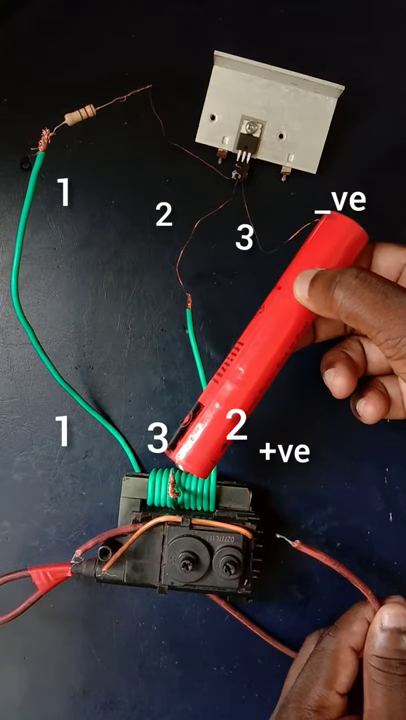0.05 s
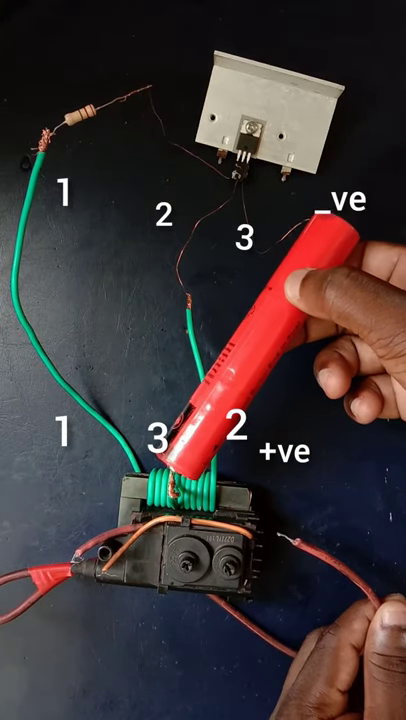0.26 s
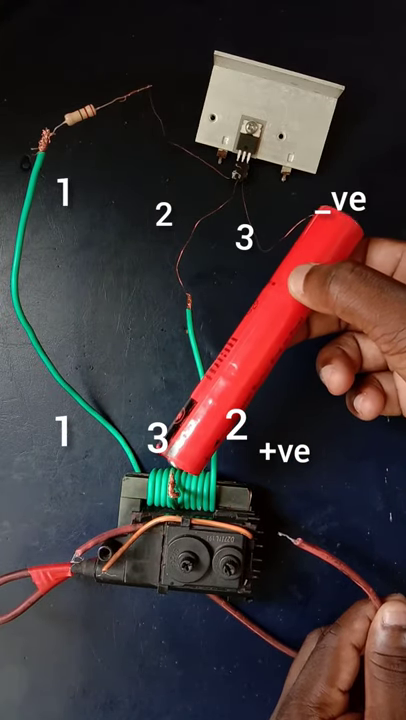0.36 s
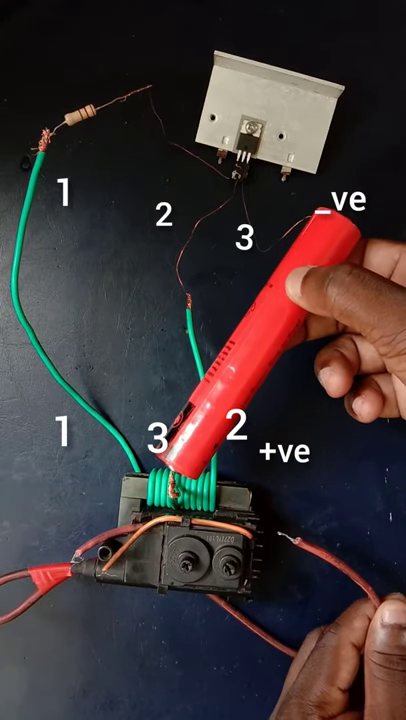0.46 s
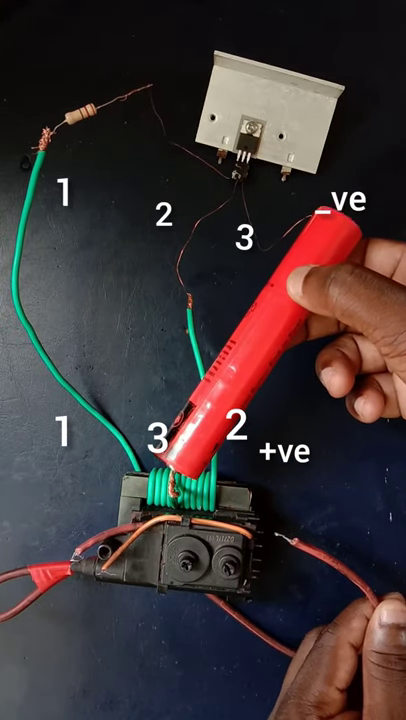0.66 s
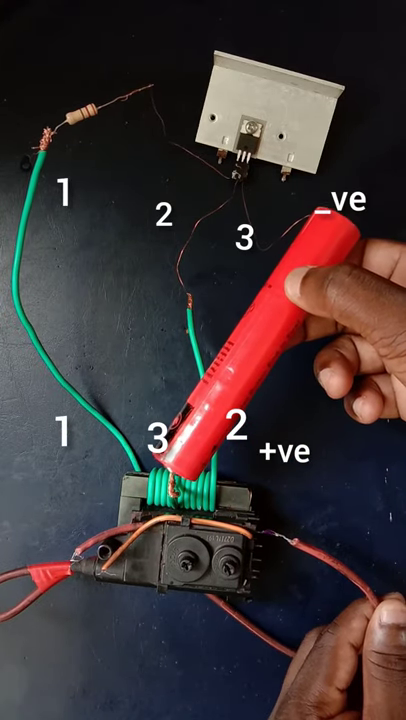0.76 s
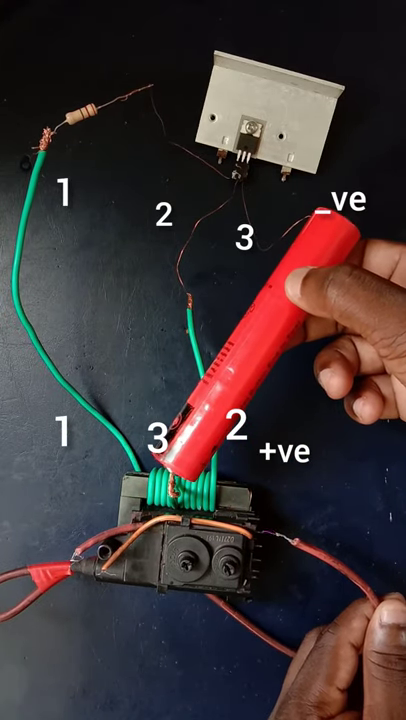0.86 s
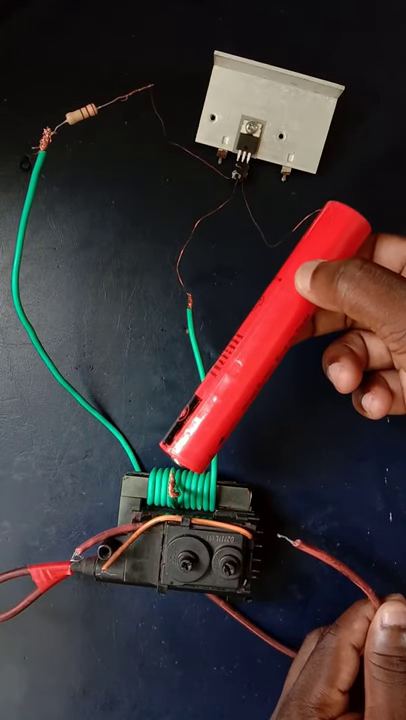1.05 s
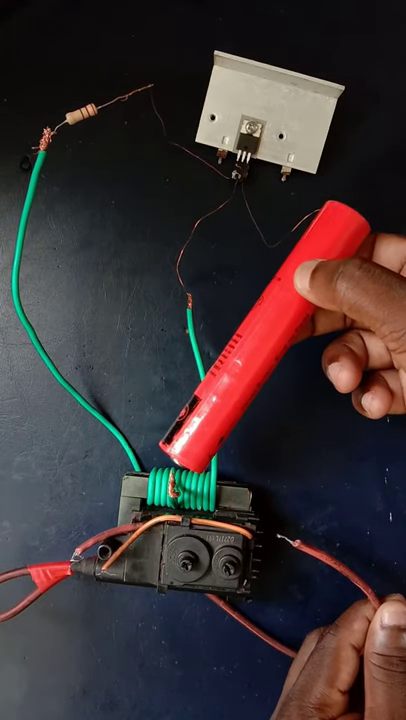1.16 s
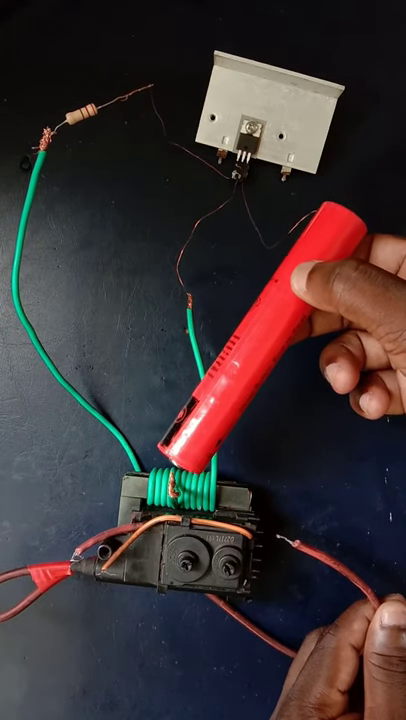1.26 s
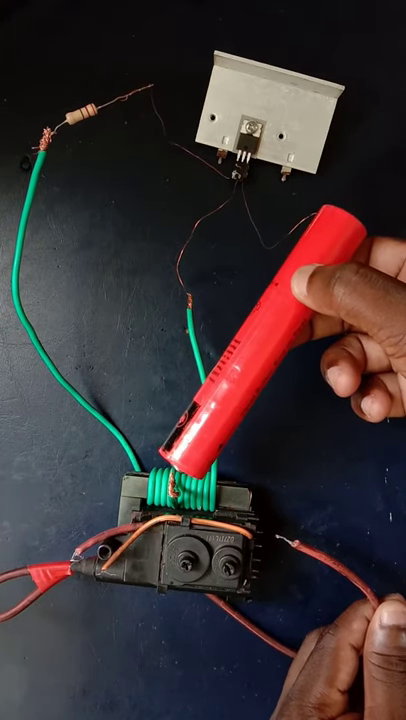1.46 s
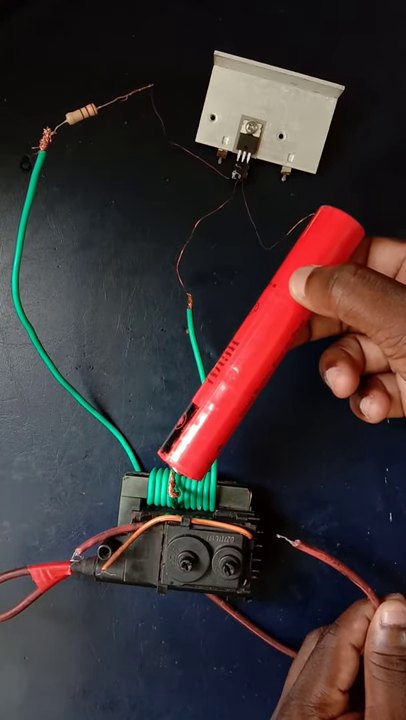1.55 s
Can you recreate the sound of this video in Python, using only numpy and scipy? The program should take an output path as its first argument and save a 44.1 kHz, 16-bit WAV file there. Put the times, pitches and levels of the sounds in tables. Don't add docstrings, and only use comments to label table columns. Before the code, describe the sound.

Electric arcing crackles in short, harsh, buzzing bursts across a small wire gap, close up.

```python
import sys
import numpy as np
from scipy import signal
from scipy.fft import rfft, irfft
from scipy.io import wavfile
from scipy.ndimage import uniform_filter1d

SR = 44100
rng = np.random.default_rng(int(sys.argv[2]) if len(sys.argv) > 2 else 0)


def to_wav(s):
    ch = np.atleast_2d(s).T
    pcm = np.round(np.clip(ch, -1, 1) * 32767)
    wavfile.write(sys.argv[1], SR, pcm.astype(np.int16))


def attenuation_scalar(level_db):
    decades = np.asarray(level_db, float) / 20
    return 10 ** decades


N = 70560

# (frequency [Hz], density [dB/Hz])
CLICK_SPECTRUM = [(500, -34), (1500, -23), (3150, -26), (6100, 0), (9500, -11), (12400, -23), (15000, -10),
                  (16000, -14)]
# (frequency [Hz], T60 [s], level [dB])
PART_RINGS = [(1950, .03, -15), (2750, .025, -18), (3750, .02, -11), (4200, .02, -11), (4980, .02, -5),
              (5770, .03, -1), (6400, .025, -4), (6930, .03, -1), (7570, .035, -2), (8280, .025, -4),
              (9790, .015, -8), (11400, .015, -14), (14600, .025, -6.5), (15250, .025, -7)]
# (frequency [Hz], width [Hz], level [dB])
TABLE_AND_HOUSING_RINGS = [(830, 630, -18.5), (1110, 190, -4), (1890, 460, -3), (2684, 410, -2.5), (3560, 390, 2),
                           (4070, 480, 3), (5005, 470, 8.5), (5455, 260, 9), (5830, 454, 12.5), (6410, 450, 11),
                           (6887, 260, 13), (7646, 350, 12.5), (8320, 390, 8.5),
                           (9030, 490, 1), (9710, 470, 6), (10220, 380, 2.5), (11030, 450, 1), (11550, 600, -1.5),
                 (12650, 700, -13), (13300, 280, -1), (13900, 300, 0), (14500, 330, 6.5), (15200, 320, 6.5)]
ECHO_DB, ECHO_GAP_S, ECHO_HOLD_S, ECHO_T60_S = .5, .0007, .0027, .006
RING_DB = 7
ROOM_DB, ROOM_T60_S = -7, 0.092


def spark():
    size = 4096
    t = np.arange(size) / SR
    window = np.clip(2 * t / ECHO_GAP_S - 1, 0, 1) * attenuation_scalar(-60 * np.maximum(t - ECHO_HOLD_S, 0) / ECHO_T60_S)
    room = rng.standard_normal(size) * attenuation_scalar(-60 * t / ROOM_T60_S)
    click = causal(shade(CLICK_SPECTRUM, 1024))
    paths = unit_energy(window * rng.standard_normal(size)) + attenuation_scalar(ROOM_DB) * unit_energy(room)
    echoes = unit_energy(np.convolve(paths, click)[:size])

    parts = 0
    for hz, t60_s, db in PART_RINGS:
        parts = parts + attenuation_scalar(db - 60 * t / t60_s) * np.sin(2 * np.pi * (hz * t + rng.random()))
    ringing = unit_energy((window + 0.25 * (t > ECHO_GAP_S)) * parts)

    tail = attenuation_scalar(ECHO_DB) * unit_energy(echoes + attenuation_scalar(RING_DB) * ringing)
    raw = tail - unit_energy(np.r_[click, np.zeros(size - 1024)])

    f = np.fft.rfftfreq(size, 1 / SR)
    colour = 0
    for hz, width_hz, db in TABLE_AND_HOUSING_RINGS:
        colour = colour + attenuation_scalar(2 * db) / (1 + (2 * (f - hz) / width_hz) ** 2) ** 2
    own = uniform_filter1d(uniform_filter1d(abs(rfft(raw)) ** 2, size=14), size=14)
    correction = causal(np.sqrt(colour / (own + 1e-3 * own.mean())))
    return -unit_energy(np.convolve(raw, correction)[:size])


# (first spark [s], length [s], level [dB], hiss lead-in [s], fade-out [s])
ARC_TIMES = [
    (.2457, .001, -21.5, .008, .0002),
    (.4855, .0733, -24, .0045, .001),
    (.7827, .1516, -24, .013, .001),
]
# (time [s], rate [1/s])
BREAKDOWN_RATE = [(.4855, 620), (.5, 640), (.507, 900), (.528, 950), (.536, 720), (.55, 640), (.559, 490),
                  (.7827, 700), (.80, 780), (.85, 820), (.90, 740), (.92, 580), (.935, 520)]
# (time [s], level re LONE_DB [dB])
LONE_SPARKS = [(0.2153, -20), (0.2229, -3), (.2324, -1.5), (.2469, -5), (.2485, -2), (.2501, -1),
               (.2516, -6), (.2531, -6), (.2546, -5), (.2563, -4), (.2581, -3), (.2599, -2), (.2618, -3),
               (.2637, -3), (.2656, -8), (.2685, -11), (0.2722, -3), (.5607, -10), (.5639, -4), (.5678, -7),
               (1.1105, -17)]
LONE_DB = -20.5
UNEVEN, SPARK_SPREAD_DB = .15, 1.3
STRIKE_DB, STRIKE_S = 1, .005
LEAD_DB, ARC_HISS_DB = -8, -14


def arcs():
    train, t = np.zeros(N), np.arange(N) / SR
    count = np.cumsum(along(BREAKDOWN_RATE)) / SR
    for start, length, db, lead, fade in ARC_TIMES:
        luck = rng.standard_normal((200, 2))
        turns = np.r_[0, np.cumsum(np.exp(UNEVEN * luck[1:, 0]))] + count[round(start * SR)]
        s = np.interp(turns, count, t) - start

        spark_db = db + STRIKE_DB * np.exp(-s / STRIKE_S) + SPARK_SPREAD_DB * luck[:, 1]
        size = np.clip(1 + (length - s) / fade, 0, 1) * attenuation_scalar(spark_db)
        rate = np.interp(start + s, *np.transpose(BREAKDOWN_RATE))
        np.add.at(train, ((start + s) * SR).astype(int), size * np.sqrt(SR / rate))

        hiss_s = [-lead, -lead / 2, 0, .0005, length, length + fade]
        hiss_gain = [0, attenuation_scalar(LEAD_DB + 2.0), attenuation_scalar(LEAD_DB), attenuation_scalar(ARC_HISS_DB), attenuation_scalar(ARC_HISS_DB), 0]
        hiss = np.interp(t - start, hiss_s, hiss_gain)
        train += attenuation_scalar(db) * hiss * rng.standard_normal(N)
    for s, db in LONE_SPARKS:
        train[round(s * SR)] += attenuation_scalar(LONE_DB + db) * 8
    return signal.oaconvolve(train, spark())[:N]


# (time [s], level [dB])
FIZZ_LEVELS = [
    [(.15, -68), (.21, -53.5), (.29, -41.5), (.37, -56), (.41, -54), (.475, -43.5), (.58, -45), (.63, -62)],
    [(.63, -61), (.676, -55.5), (.692, -42), (.73, -40), (.765, -55.5), (.94, -39), (1.0, -42.5),
     (1.05, -63.5)],
    [(1.05, -66), (1.09, -51), (1.105, -51), (1.165, -41), (1.21, -58.5), (1.3, -100), (1.56, -70),
     (1.575, -44.5), (1.6, -36)],
]
# (frequency [Hz], width [Hz], level [dB])
FIZZ_BANDS = [(2060, 920, -5.5), (2935, 290, -7.5), (3640, 620, -5), (4664, 710, -0.5), (5750, 300, 3.5),
              (6250, 310, 3), (7140, 280, 3), (7630, 420, 5), (8640, 500, -9), (10140, 1140, -14.5),
              (12060, 800, -16.5), (13300, 300, -26), (14550, 380, -7.5), (15350, 500, -4)]
# (peak [s], half width [s], level [dB])
FIZZ_FLARES = [
    (.953, .006, -31.5),
    (1.112, 0.0021, -49),
    (1.125, 0.024, -43.5),
    (1.137, 0.0045, -32.5),
    (1.581, 0.0023, -53),
]
# (frequency [Hz], width [Hz], level [dB])
FLARE_BANDS = [(1300, 650, -4), (2280, 510, -7), (3660, 890, -7.5), (5894, 250, 11), (7320, 1430, -1.5),
               (14900, 2500, -9.5)]
FIZZ_PATCH_DB, FIZZ_BED_DB = 2.6, -30


def fizz():
    hiss = patchy(FIZZ_BANDS, FIZZ_PATCH_DB, 29) + attenuation_scalar(FIZZ_BED_DB) * rng.standard_normal(N)
    t = np.arange(N) / SR
    level = 0
    for table in FIZZ_LEVELS:
        level = level + attenuation_scalar(along(table)) * (t >= table[0][0]) * (t <= table[-1][0])
    return level * hiss + bumps(FIZZ_FLARES) * patchy(FLARE_BANDS, 0.63, 89)


FIRING_LEVELS = [-48, -50, -45.5, -43.5, -40.5, -45, -62, -43.5, -56, -62, -55, -38.5, -45, -51, -46, -71,
                 -49, -44.5, -63, -40, -47, -47, -41.5, -59, -41.5, -42, -45, -40]
FIRST_FIRING_S, FIRING_S, THUD_HZ, THUD_S = -0.0052, .0581, 87, 0.0095


def engine_thuds():
    t, thuds = np.arange(N) / SR, np.zeros(N)
    for k, db in enumerate(FIRING_LEVELS):
        u = t - FIRST_FIRING_S - k * FIRING_S
        thuds -= attenuation_scalar(db) * np.exp(-.5 * (u / THUD_S) ** 2) * np.cos(2 * np.pi * THUD_HZ * u)
    return thuds


# (time [s], level [dB], upper whine re whir [dB], whir frequency [Hz])
WHIR_TRACK = [(0.0, -46.5, -5.5, 1286), (0.026, -44, -11, 1202), (0.044, -51.5, 7, 1330),
              (0.28, -51, -10.5, 1165), (0.298, -41, -13, 1265), (0.378, -53, -2.5, 1240),
              (0.45, -44.5, -16.5, 1240), (0.53, -50, -21, 1100), (0.664, -49, -8, 1327),
              (0.86, -46.5, -16, 1144), (0.918, -48.5, -52, 1095), (0.948, -44, 2, 1300),
              (1.09, -53, -5, 1296), (1.14, -39, -26, 1243), (1.188, -49.5, -5, 1282),
              (1.282, -47.5, -3, 1242), (1.514, -59.5, -5, 1177), (1.6, -49.5, -10, 1222)]
# (frequency [Hz], width [Hz], level [dB])
WHIR_BODY = [(609, 186, -11.5), (846, 115, -13), (1115, 364, -6), (1240, 140, -3.5), (1351.7, 37, 0)]
# (frequency [Hz], width [Hz], level [dB])
WHINE_BANDS = [(1476, 75, 4.5), (1590, 334, -5)]
WHIR_WIDTH_HZ, WHIR_BODY_DB = 95, -0.5
WHIR_THROB_DB, WHIR_PATCH_DB = 1.5, 4


def engine_whir():
    t = np.arange(N) / SR
    throb_db = WHIR_THROB_DB * np.cos(2 * np.pi * (t - FIRST_FIRING_S - .015) / FIRING_S)
    gliding = evened(glide(rng.standard_normal(N), along(WHIR_TRACK, column=3), WHIR_WIDTH_HZ))
    whir = evened(gliding + attenuation_scalar(WHIR_BODY_DB) * patchy(WHIR_BODY, WHIR_PATCH_DB, 15.5))
    whine = attenuation_scalar(along(WHIR_TRACK, column=2)) * patchy(WHINE_BANDS, WHIR_PATCH_DB, 3.7)
    return attenuation_scalar(along(WHIR_TRACK) + throb_db) * (whir + whine)


# (peak [s], half width [s], level [dB])
EXHAUST_PUFFS = [(.10, 0.027, -57.5), (.21, 0.021, -52.5), (.30, 0.041, -57), (.42, 0.046, -56.5),
                 (.635, 0.032, -53), (.695, 0.025, -55.5), (.96, 0.035, -51.5), (1.125, 0.031, -46.5),
                 (1.34, 0.049, -52), (1.43, 0.041, -60), (1.575, 0.029, -51.5)]
# (frequency [Hz], width [Hz], level [dB])
PIPE_RINGS = [(193, 72, -1), (223, 123, -4), (284.7, 25.6, -1), (405, 63, -12.5)]


def exhaust():
    return bumps(EXHAUST_PUFFS) * patchy(PIPE_RINGS, 3.5, 20)


# (peak [s], half width [s], level [dB], frequency [Hz], width [Hz])
FAR_HOOTS = [(.022, 0.0037, -42.5, 1240, 90), (.05, 0.038, -61.5, 3050, 900),
             (0.062, 0.005, -48, 1620, 120), (.074, 0.0018, -44, 1560, 200), (.11, 0.04, -49.5, 1580, 413),
             (.31, 0.011, -48, 1239, 101), (0.397, 0.0038, -47.5, 7700, 400), (.42, 0.013, -55, 4720, 150),
             (0.441, 0.0078, -43, 1222, 100), (.648, 0.0048, -56, 3300, 900), (0.814, 0.01, -49, 834, 50),
             (.905, 0.017, -44, 1112, 70), (.953, 0.0036, -46, 1355, 120), (1.138, 0.0072, -43, 904, 80),
             (1.138, .008, -48.5, 2000, 140), (1.29, 0.044, -54, 1580, 452), (1.54, .02, -56, 614, 158),
             (.18, 0.033, -68, 14900, 900), (.19, 0.022, -54, 1710, 300), (1.2, .02, -56.5, 747, 200),
             (.71, .025, -47.5, 5980, 600)]


def hoots():
    out = 0
    for s, half_s, db, hz, width_hz in FAR_HOOTS:
        tone = signal.hilbert(rings(rng.standard_normal(N), [(hz, width_hz, 0)], order=2))
        out = out + bumps([(s, half_s, db)]) * evened(tone.real / np.sqrt(abs(tone) + 1e-9))
    return out


# (frequency [Hz], density [dB/Hz])
ROOM_SPECTRUM = [(18, -48), (30, -3.5), (86, 0.5), (483, -12), (1240, -16), (2100, -15), (7390, -19.5),
                 (8640, -33.5), (15800, -47)]
ROOM_NOISE_DB, WASH_PATCH_DB = -56.5, 4.5


def wash():
    noise = irfft(rfft(rng.standard_normal(N)) * shade(ROOM_SPECTRUM, N), N)
    z = signal.stft(noise, nperseg=512)[2]
    patches = uniform_filter1d(rng.standard_normal(z.shape), size=6, axis=0)
    patches = evened(uniform_filter1d(patches, size=9, axis=1))
    patched = signal.istft(z * attenuation_scalar(WASH_PATCH_DB * patches), nperseg=512)[1][:N]
    return attenuation_scalar(ROOM_NOISE_DB) * evened(patched)


# (frequency [Hz], width [Hz], level [dB])
ROOM_BANDS = [(4703, 92, -65), (6100, 71, -63.5), (7360, 450, -66), (9380, 340, -84.5), (15000, 540, -90)]


def room_noise():
    bands = 0
    for ring in ROOM_BANDS:
        bands = bands + attenuation_scalar(20 + 2.5 * drift(12)) * rings(rng.standard_normal(N), [ring], order=2)
    return wash() + bands + hoots()


# (peak [s], half width [s], level [dB])
CHANNEL_SLIPS = [
    (.221, .004, -15),
    (.490, .005, -6),
]
SIDE_DB, SIDE_HISS_DB = -22, -91


def channel_difference(mid):
    scatter = np.convolve(mid, evened(rng.standard_normal(100)) / 10)[:N]
    band = signal.sosfilt(signal.butter(6, [4000, 10500], "band", fs=SR, output="sos"), scatter)
    return attenuation_scalar(SIDE_DB) * wash() + attenuation_scalar(SIDE_HISS_DB) * rng.standard_normal(N) + bumps(CHANNEL_SLIPS) * band


def evened(x):
    return x / np.sqrt(np.mean(x ** 2) + 1e-20)


def unit_energy(x):
    return x / np.linalg.norm(x)


def along(points, column=1):
    points = np.transpose(points)
    return np.interp(np.arange(N) / SR, points[0], points[column])


def shade(points, size):
    f, db = np.transpose(points)
    return attenuation_scalar(np.interp(np.log(np.fft.rfftfreq(size, 1 / SR) + 1), np.log(f + 1), db))


def causal(gain):
    log_gain = np.log(gain + 1e-5)
    spectrum = np.conj(signal.hilbert(np.r_[log_gain, log_gain[-2:0:-1]]))
    return irfft(np.exp(spectrum[:len(gain)]))


def rings(x, table, order=1):
    out = 0
    for k, (hz, width_hz, db) in enumerate(table):
        b, a = signal.iirpeak(min(hz, 20000), hz / width_hz, SR)
        y = x
        for _ in range(order):
            y = signal.lfilter(b, a, y)
        out = out + (-1) ** k * attenuation_scalar(db) * y
    return out


def drift(rate_hz):
    return evened(signal.lfilter(*signal.butter(2, rate_hz, fs=SR), rng.standard_normal(N)))


def patchy(table, depth_db, rate_hz):
    out = 0
    for ring in table:
        out = out + attenuation_scalar(depth_db * drift(rate_hz)) * rings(rng.standard_normal(N), [ring], order=2)
    return evened(out)


def bumps(table):
    t = np.arange(N) / SR
    return sum(attenuation_scalar(db) * np.exp(-.5 * ((t - s) / half_s) ** 2) for s, half_s, db in table)


def glide(x, hz, width_hz):
    turn = np.exp(2j * np.pi * np.cumsum(hz) / SR)
    r = np.exp(-np.pi * width_hz / SR)
    return (turn * signal.lfilter([(1 - r) ** 2], [1, -2 * r, r * r], x / turn)).real


ARC_TRIM_DB, DUCK_DB = 0.5, -2


def scene():
    sparks = attenuation_scalar(ARC_TRIM_DB) * arcs()
    loudness = np.clip(uniform_filter1d(abs(sparks), size=2600) / 0.064, 0, 1)
    gap = sparks + fizz()
    engine = engine_thuds() + engine_whir() + exhaust()
    mid = gap + attenuation_scalar(DUCK_DB * loudness) * (engine + room_noise())
    side = channel_difference(mid)
    return np.array([mid + side, mid - side])


def top_cut(x):
    return signal.sosfilt(signal.butter(12, 16630, fs=SR, output="sos"), x)


def record(dry):
    edge_hz = 15450
    lowpass = signal.firwin(601, edge_hz, window=("kaiser", 8), fs=SR)
    limited = signal.oaconvolve(dry, lowpass[None], "same")
    return top_cut(limited)


dry = scene()
out = record(dry)
to_wav(out)
```